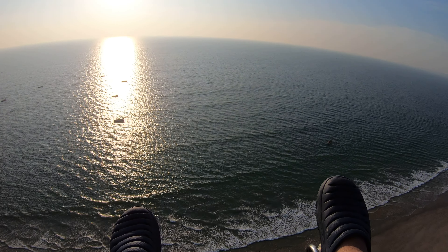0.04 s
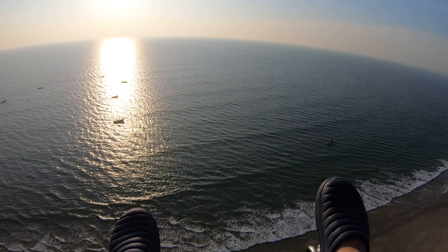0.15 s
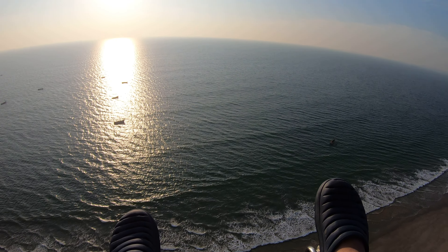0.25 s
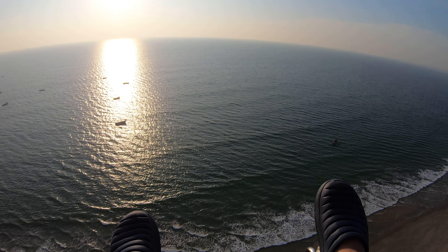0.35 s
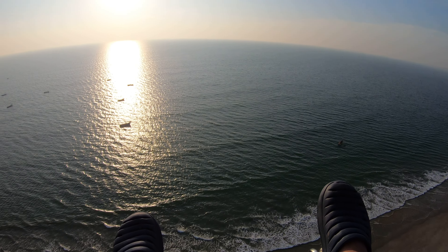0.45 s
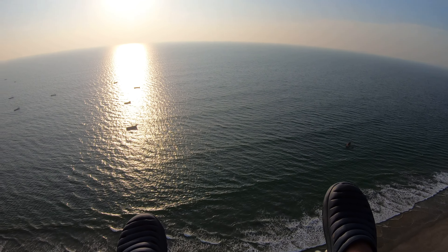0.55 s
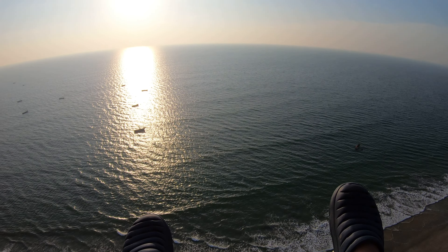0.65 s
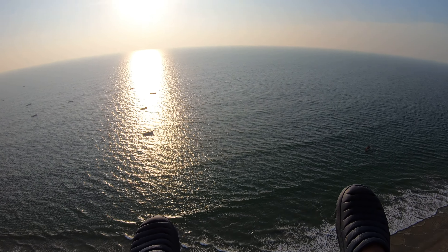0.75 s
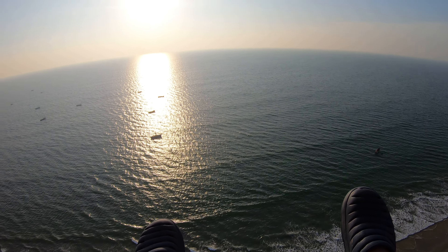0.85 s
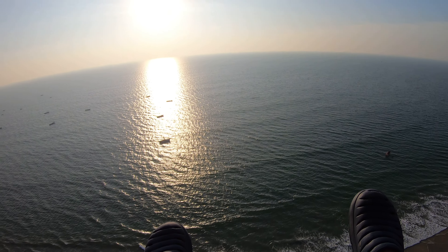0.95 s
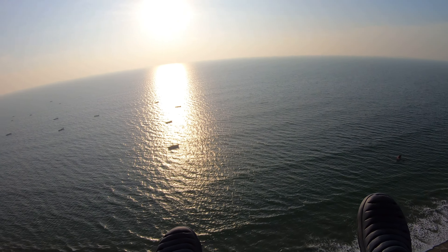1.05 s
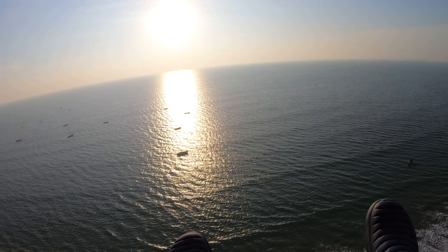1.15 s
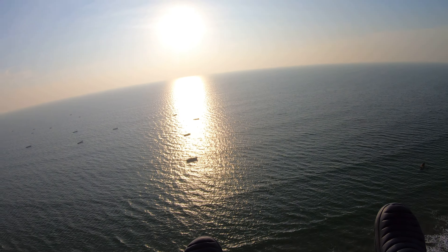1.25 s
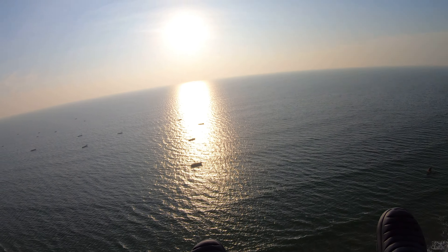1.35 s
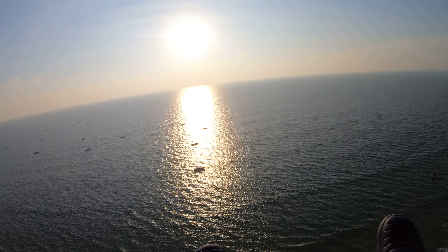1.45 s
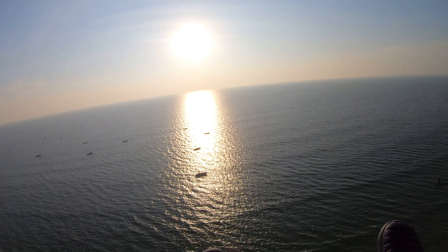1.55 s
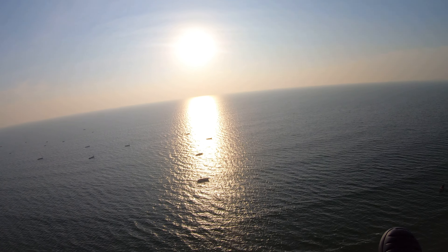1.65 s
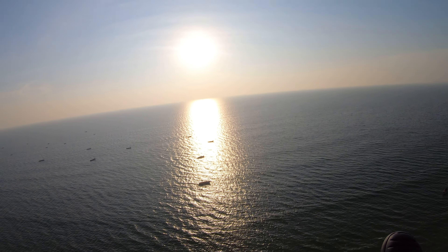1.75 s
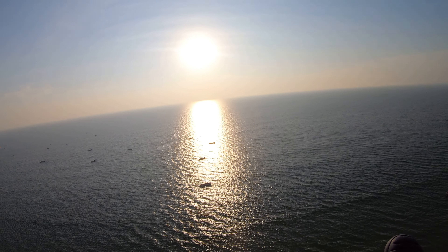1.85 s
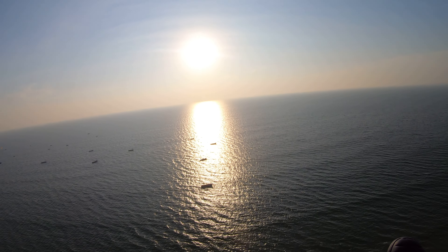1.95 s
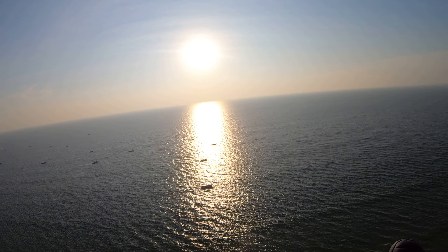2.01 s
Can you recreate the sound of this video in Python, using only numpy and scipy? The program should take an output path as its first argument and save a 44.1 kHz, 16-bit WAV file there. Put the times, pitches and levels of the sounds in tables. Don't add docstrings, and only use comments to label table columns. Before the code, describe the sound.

Open air in flight, very close and dry, with the microphone riding with the pilot. A small four-stroke engine and geared propeller drone throughout: a low, buzzing, slightly beating hum with rough exhaust pulses and faint, fast metallic valve ticking very high above. Wind rumbles, buffets and hisses on the microphone, its roar fluttering with the exhaust. At 0 s a short high chirp; at 0.5 s a cloth flap; around 0.7-0.95 s a loud whistle swoops upward amid rapid fabric flaps. At 1.1 s more flaps and a second rising whistle, which fades slowly with airy hiss over the next seconds. The engine dips slightly until 1.5 s, climbs clearly from 2 to 3.5 s, then creeps higher until 9 s, fuller and more loaded. Wind thuds recur irregularly, stronger near 4.2, 6.4 and 8.6 s; a few tiny faint flaps occur at 3.5, 4.3 and after 8.5 s. It stops without fading.

```python
import sys
import numpy as np
from scipy import signal
from scipy.fft import rfft, irfft, next_fast_len
from scipy.io import wavfile
from scipy.ndimage import uniform_filter1d, map_coordinates

SR = 44100
rng = np.random.default_rng(int(sys.argv[2]) if len(sys.argv) > 2 else 0)


def dump_mix(stems):
    frames = np.atleast_2d(stems).T
    limited = np.clip(frames, -1, 1)
    pcm = np.round(limited * 32767).astype(np.int16)
    wavfile.write(sys.argv[1], SR, pcm)


def volts_from_db(level):
    exponent = np.asarray(level, float) / 20
    return 10 ** exponent


N = 401310
T = np.arange(N) / SR

# time_s, blade_passes_per_s
SPEED = [(0, 82.49), (0.5, 84.1), (1, 82.3), (1.5, 81.42), (2, 83.25), (2.5, 85.03), (3, 88.44),
         (3.25, 91.12), (3.5, 92.93), (4.2, 94.11), (4.5, 95.67), (5.3, 96.46), (6, 97.74), (6.75, 98.72),
         (7, 98.09), (7.75, 99.09), (9.1, 100.41)]
GEAR = 1.1458
SLOW_HZ = 84
# time_s, tones_db, valve_gear_db
ENGINE = [(0, 1, -65.5), (.6, -1.5, -64), (1.0, -4, -63), (1.3, -0.5, -65), (2.4, 1, -59.5),
          (2.9, 2.5, -58), (3.5, -2, -60.5), (4.25, 1.5, -59), (5.0, 0.5, -57.5), (6.0, 0.5, -58),
          (6.6, -3, -64.5), (7.2, 3, -63), (7.9, -0.5, -61), (8.4, -3, -63.5), (9.1, 0, -64)]
# centre_hz, width_hz, lift_db
SEAT_FRAME = [(115, 3.4, 5), (177.3, 7.3, 4), (284.3, 3.4, 1.5)]
WANDER_DB = 0.85

# multiple, slow_level_db, gain_db_per_extra_pass_per_s
BLADE_LOW = [(1, -35.5, 0.46), (2, -21, -0.28), (3, -22.5, 0)]
# multiple, level_db relative to the third tone
BLADE_HIGH = [(4, -18.5), (5, -30), (6, -30)]

# shaft_order, slow_level_db, load_gain_db
LOW_ORDERS = [(1, -30.5, 2.5), (2, -26.5, 5), (.5, -42.5, 5.5), (1.5, -36, 3.5)]
# shaft_order, level_db
HIGH_ORDERS = [(2.5, -6), (3, -6), (4, -11), (4.5, -11), (5, -19), (5.5, -21), (6, -17), (6.5, -16),
               (7, -18), (7.5, -23), (8, -23), (8.5, -21), (9, -26), (9.5, -26)]
HIGH_ORDERS_DB = -31.5
# freq_hz, density_db
CAGE_TUBE = [(450, -120), (550, -13.5), (582, 1.5), (615, -13), (750, -120)]

TICK_DB = [9, 0, 0.5, -2.5, -5, 1.5]
TICK_START = .37
# freq_hz, density_db
SLOW_TICK = [(6000, -120), (7200, -13), (8300, 1), (9300, -2.5), (9900, -14), (10800, -16), (11600, -29),
             (13600, -34), (14300, -43.5), (15500, -120)]
# freq_hz, density_db
FAST_TICK = [(7000, -120), (8300, -8), (9300, 0), (9900, -9.5), (10700, -9), (11600, -19), (12100, -29.5),
             (13500, -35), (14200, -46), (15500, -120)]
# freq_hz, density_db
FINS = [(9500, -120), (10300, -3.5), (11300, -4.5), (11900, -9.5), (13500, -7), (14100, -20),
        (14700, -18.5), (15200, -20.5), (15800, -120)]
FINS_DB, FINS_LOAD_DB = -80.5, 9
FINS_FOLLOW, CASING_FOLLOWS = 1.1, 0.39
# freq_hz, density_db
CASING = [(4500, -120), (5500, -2), (6300, -2.5), (7500, 0), (8500, -2.5), (9500, -13), (10000, -18.5),
          (11500, -30.5), (12000, -39), (13700, -43.5), (15100, -53.5), (15800, -120)]

# time_s, strength_db
AIR = [(0, -24), (.07, -24), (.2, -28), (.62, -27.5), (.88, -24), (.98, -31.5), (1.14, -25.5), (1.4, -29),
       (2.6, -30.5), (3.3, -28), (5.3, -27.5), (6.0, -25.5), (6.48, -25), (6.62, -28.5), (7.3, -27.5),
       (8.3, -25.5), (8.7, -27), (9.1, -27.5)]
CALM_DB = -28
# mean_db, db_per_db_of_stream, load_gain_db, own_gusting_db, lead_s
RUMBLE_LAW = (-25, .4, 4, 0.7, -1.5)
BUFFET_LAW = (-20.5, 0.67, 0.5, 0.6, 0.2)
ROAR_LAW = (-28, 1.0, 0, 1, 0)
HISS_LAW = (-39.5, 1.18, -1, 0.7, .0)
CASING_LAW = (-55.5, .5, 0, 0.4, .0)
# freq_hz, density_db
RUMBLE = [(10, -120), (18, -23), (28, -9.5), (50, -3.5), (90, -4.5), (140, -20.5), (250, -36.5),
          (400, -120)]
# freq_hz, density_db
BUFFET = [(50, -120), (80, -17), (120, -1.5), (200, -1), (300, -4.5), (360, -12.5), (500, -33.5),
          (900, -120)]
# freq_hz, density_db
ROAR = [(200, -120), (280, -8.5), (380, 0.5), (600, -4.5), (1000, -8), (1500, -12), (2200, -29.5),
        (4000, -120)]
# freq_hz, density_db
HISS = [(900, -120), (1300, -11), (1800, -1.5), (2500, -5.5), (3300, -10), (4300, -16.5), (5000, -18.5),
        (5600, -24.5), (7000, -52.5), (11000, -120)]
# time_s, length_s, buffet_db, rumble_db
SURGES = [(0.116, .03, 7, 4), (0.383, 0.075, 6.5, 2), (0.69, .08, 3, 0), (1.2, 0.06, 5, -5),
          (2.7, .1, 0, 3.5), (3.3, 0.068, 0.5, 4), (3.873, 0.055, 2, 5), (4.21, 0.09, 6, 2),
          (5.652, 0.18, -3.5, 2), (6.153, 0.14, 2, -3), (6.45, 0.13, 4.5, 5), (7.35, 0.065, 4, -4),
          (8.143, 0.049, -3, 3), (8.6, .1, 4, 4.5)]

# start_s, swing_s, first_whistle_hz, level_db, t60_s
TURNS = [
    (0, 0.11, 1400, -43, .2),
    (.68, .26, 419, -23, .25),
    (1.13, .2, 520.5, -27.5, 1.8),
]
EDGE_HZ, WHISTLE_ATTACK_S = 1400, 0.049
SAG_DB = 4.5
# freq_hz, density_db
SPRAY = [(800, -120), (1200, -7.5), (1800, 1), (2600, -6.5), (3600, -11.5), (4800, -19), (7000, -120)]
SPRAY_DB, SPRAY_T60_S = -12, 3.4

# start_s, level_db, length_s
FLAPS = [(0.511, -30.5, 0.023), (0.749, -29, .012), (0.78, -28, .012), (0.838, -24, 0.013),
         (0.867, -26, 0.023), (0.901, -31, 0.017), (0.94, -32, 0.02), (1.065, -28.5, 0.022),
         (1.095, -27, .012), (3.498, -38, .006), (4.322, -37, .006), (8.552, -38, .006),
         (8.89, -33.5, .006)]
# freq_hz, density_db
CLOTH = [(500, -120), (800, -4), (1300, 3), (2000, -3), (3000, -2.5), (4200, -8.5), (4900, -17),
         (5600, -39), (8000, -120)]

SQUEEZE, SQUEEZE_S, SQUEEZE_DB = .15, .025, -15


def unit(x):
    return x / np.sqrt(np.mean(x ** 2) + 1e-20)


def curves(rows):
    s, *cols = np.transpose(rows)
    return [np.interp(T, s, c) for c in cols]


def wobble(rate):
    knots = rng.standard_normal(int(N * rate / SR) + 4)
    return map_coordinates(knots, [T * rate])


def rush(spectrum, patchy_db):
    z = signal.stft(rng.standard_normal(N + 512), nperseg=512)[2]
    field = uniform_filter1d(rng.standard_normal(z.shape), size=5, axis=0)
    field = uniform_filter1d(field, size=8, axis=1)
    x = signal.istft(z * volts_from_db(patchy_db * unit(field)), nperseg=512)[1][:N]
    hz, db = np.transpose(spectrum)
    m = next_fast_len(N)
    log_hz = np.log(np.fft.rfftfreq(m, 1 / SR) + 1)
    gain = volts_from_db(np.interp(log_hz, np.log(hz + 1), db))
    return unit(irfft(rfft(x, m) * gain, m)[:N])


def load():
    return np.clip((curves(SPEED)[0] - SLOW_HZ) / 10, 0, 1)


def stream(law, rate):
    mean_db, follows, load_db, gust_db, lead_s = law
    air_db = np.interp(T + lead_s, *np.transpose(AIR))
    return mean_db + follows * (air_db - CALM_DB) + load_db * load() + gust_db * wobble(rate)


def surges():
    return sum(np.outer(db, np.exp(-((T - s) / length) ** 2)) for s, length, *db in SURGES)


def whistle():
    tones, spray = 0, 0
    for s, swing, first_hz, db, t60 in TURNS:
        done = np.clip((T - s) / swing, 0, 1)
        after = np.maximum(T - s - swing, 0)
        hz = first_hz * (EDGE_HZ / first_hz) ** done
        glide = 2 * np.pi * np.cumsum(hz) / SR
        wide = np.clip(hz / 1500, 0, 1)

        def band():
            return np.sqrt(1 - wide) * wobble(450) + np.sqrt(wide) * wobble(1000)

        rise = np.clip((T - s) / WHISTLE_ATTACK_S + 1, 0, 1)
        level = rise * volts_from_db(db - SAG_DB * done - 60 * after / t60)
        tones = tones + level * (band() * np.cos(glide) + band() * np.sin(glide))
        spray = spray + np.sqrt(done) * volts_from_db(db + SPRAY_DB - 60 * after / SPRAY_T60_S)
    return tones + spray * rush(SPRAY, patchy_db=2.5)


def wind(shaft):
    buffet_lift_db, rumble_lift_db = surges()
    rumble_db = stream(RUMBLE_LAW, rate=7) + rumble_lift_db
    buffet_db = stream(BUFFET_LAW, rate=6.2) + buffet_lift_db
    roar_db, hiss_db = stream(ROAR_LAW, rate=4.6), stream(HISS_LAW, rate=4.5)
    blast = np.cos(np.pi * shaft - 4.2) + .4 * np.cos(2 * np.pi * shaft - 2.5)
    blast = (.5 + .5 * load()) * blast
    eddy = .7 * wobble(45)
    rumble = volts_from_db(rumble_db) * rush(RUMBLE, patchy_db=-1.5)
    buffet = volts_from_db(buffet_db) * rush(BUFFET, patchy_db=2.0)
    roar = unit(volts_from_db(2.56 * blast + eddy + 0.37 * wobble(60)) * rush(ROAR, patchy_db=-0.1))
    hiss = unit(volts_from_db(1.3 * blast + 0.99 * eddy) * rush(HISS, patchy_db=.5))
    return rumble + buffet + volts_from_db(roar_db) * roar + volts_from_db(hiss_db) * hiss + whistle()


def flaps():
    shape = sum(volts_from_db(db) * (T > s) * np.exp(-np.abs(T - s) / length) for s, db, length in FLAPS)
    return uniform_filter1d(shape, size=80) * rush(CLOTH, patchy_db=0.5)


def clatter(shaft):
    fast = load()
    valve_db = curves(ENGINE)[1]
    effort_db = valve_db - valve_db.max()
    turns = shaft - TICK_START * len(TICK_DB) + .25 * (1 - fast)
    index = np.floor(turns).astype(int)
    uneven_db = 1.2 * rng.standard_normal(index[-1] + 9)[index]
    size_db = (0.56 + 0.45 * fast) * np.array(TICK_DB)[index % len(TICK_DB)] + uneven_db
    blow = volts_from_db(size_db) * np.exp(-((turns % 1 - .5) / .24) ** 2)
    rattle = signal.lfilter([.004], [1, -.996], blow)
    blow = unit(blow + 1.6 * rattle + .3)
    ring = np.sqrt(1 - fast) * rush(SLOW_TICK, patchy_db=1.5)
    ring = ring + np.sqrt(fast) * rush(FAST_TICK, patchy_db=0.0)
    fins_db = FINS_DB + FINS_LOAD_DB * fast + FINS_FOLLOW * effort_db
    fins = volts_from_db(fins_db) * unit(np.sqrt(blow)) * rush(FINS, patchy_db=1.0)
    casing_db = stream(CASING_LAW, rate=3.1) + CASING_FOLLOWS * effort_db
    casing = volts_from_db(casing_db) * rush(CASING, patchy_db=1.0)
    return volts_from_db(valve_db) * blow * ring + fins + casing


def tone(turns, db, flutter_db, slip):
    phase = 2 * np.pi * (turns + rng.random()) + slip * wobble(11)
    return np.sqrt(2) * volts_from_db(db + flutter_db * wobble(14)) * np.sin(phase)


def engine_tone(multiple, turns, rate_hz, db, flutter_db, slip):
    tone_hz = multiple * rate_hz
    lift_db = sum(top_db / (1 + ((tone_hz - hz) / wide) ** 2) for hz, wide, top_db in SEAT_FRAME)
    level_db = db + curves(ENGINE)[0] + lift_db + WANDER_DB * wobble(2.504)
    return tone(multiple * turns, level_db, flutter_db, slip)


def exhaust(shaft):
    rate_hz = GEAR * curves(SPEED)[0]
    parts = [(k, db + gain_db * load()) for k, db, gain_db in LOW_ORDERS]
    for k, db in HIGH_ORDERS:
        pipe_db = 5 / (1 + ((k * rate_hz - 497) / 9) ** 2)
        parts.append((k, HIGH_ORDERS_DB + db + 1.7 * load() + pipe_db + 1.6 * wobble(1.3)))
    cage = volts_from_db(-39 - 5.0 * load()) * rush(CAGE_TUBE, patchy_db=4.0)
    return cage + sum(engine_tone(k, shaft, rate_hz, db, flutter_db=0.6, slip=0.13) for k, db in parts)


def propeller(passes):
    rate_hz = curves(SPEED)[0]
    parts = [(k, db + gain_db * (rate_hz - SLOW_HZ)) for k, db, gain_db in BLADE_LOW]
    third_db = parts[-1][1]
    parts += [(k, third_db + db + 4.5 - 7 * load()) for k, db in BLADE_HIGH]
    return sum(engine_tone(k, passes, rate_hz, db, flutter_db=0.1, slip=0.12) for k, db in parts)


def scene():
    passes = np.cumsum(curves(SPEED)[0]) / SR
    shaft = GEAR * passes
    mix = wind(shaft) + flaps() + clatter(shaft) + exhaust(shaft) + propeller(passes)
    return mix[None]


def band_limit(x):
    return signal.sosfilt(signal.butter(12, 15150, fs=SR, output="sos"), x)


def record(dry):
    power = np.abs(uniform_filter1d(dry ** 2, size=round(SQUEEZE_S * SR))) + 1e-6
    level = dry * (power / volts_from_db(2 * SQUEEZE_DB)) ** (-SQUEEZE / 2)
    soft = level / (1 + np.abs(level / 0.81) ** 4.4) ** (1 / 4.2)
    mix = soft * np.clip(T / .003, 0, 1)
    return band_limit(mix)


dry = scene()
out = record(dry)
dump_mix(out)
```